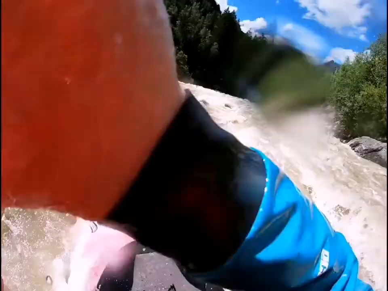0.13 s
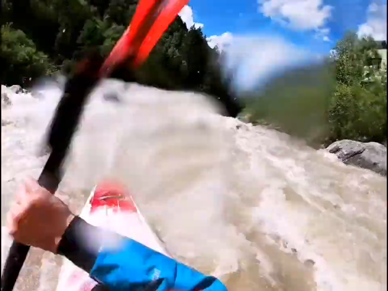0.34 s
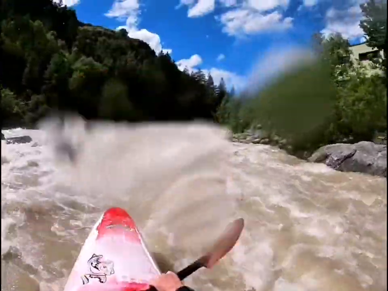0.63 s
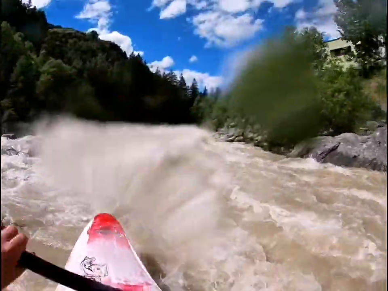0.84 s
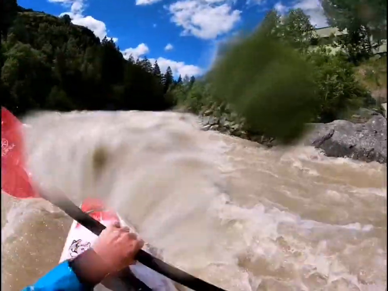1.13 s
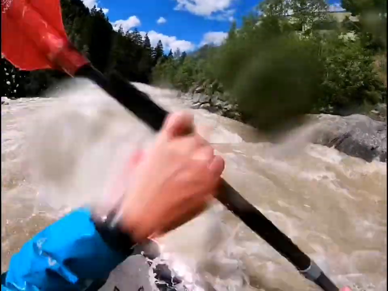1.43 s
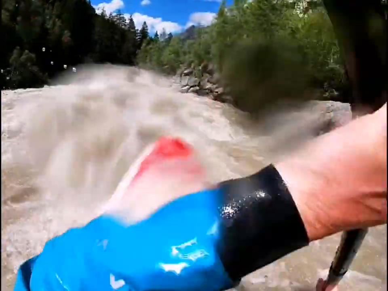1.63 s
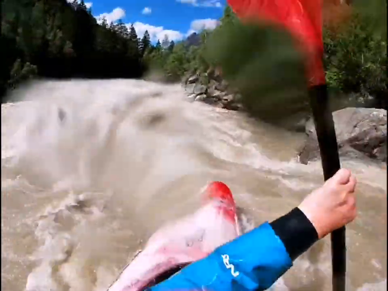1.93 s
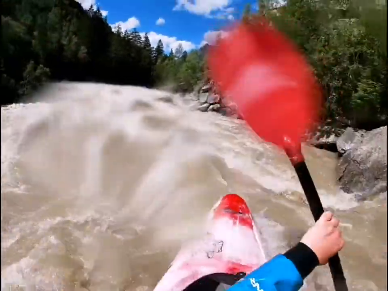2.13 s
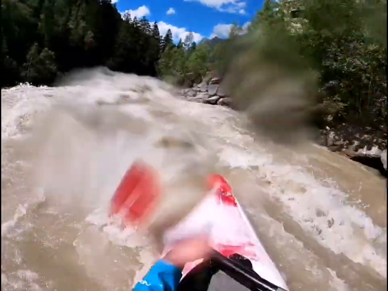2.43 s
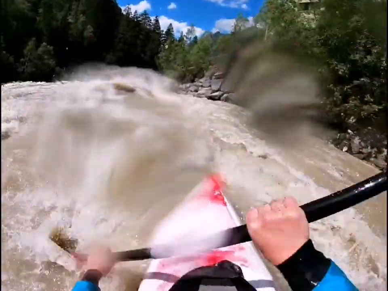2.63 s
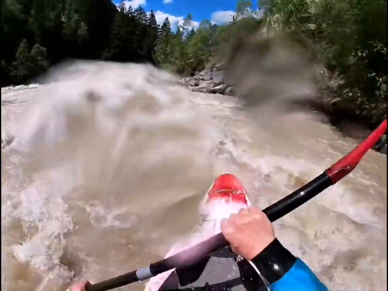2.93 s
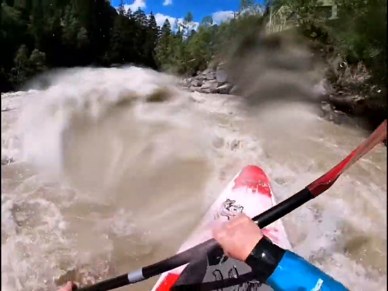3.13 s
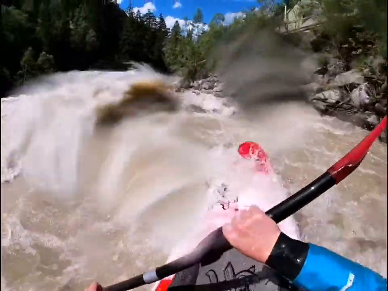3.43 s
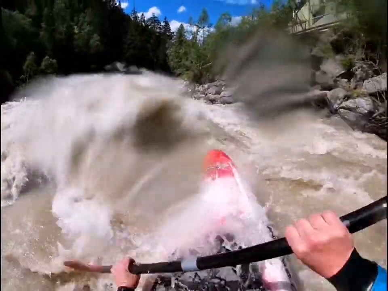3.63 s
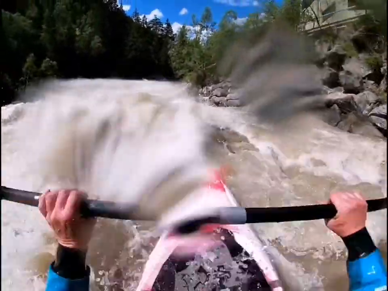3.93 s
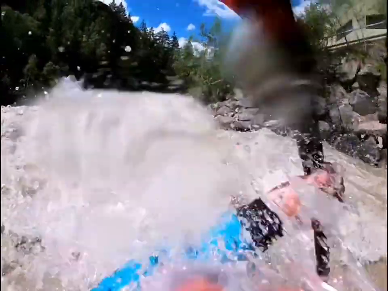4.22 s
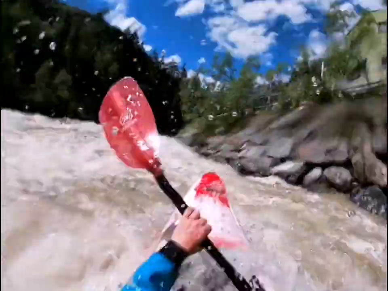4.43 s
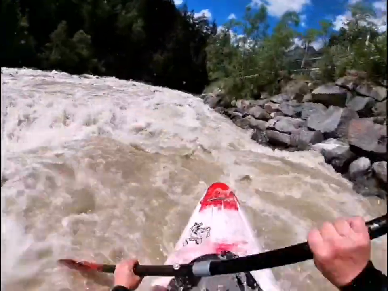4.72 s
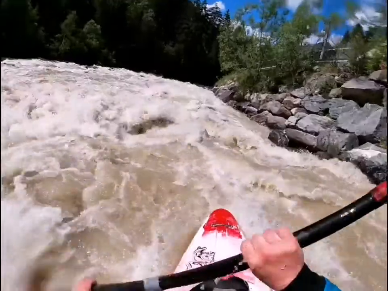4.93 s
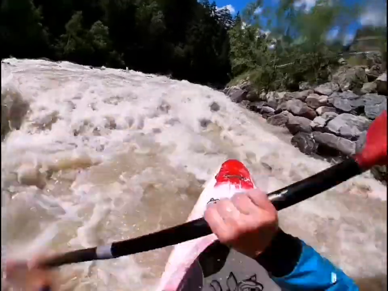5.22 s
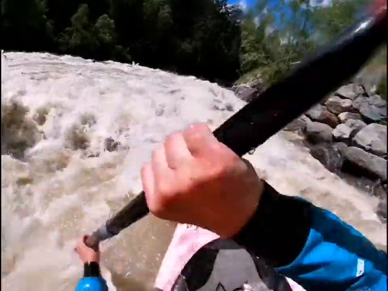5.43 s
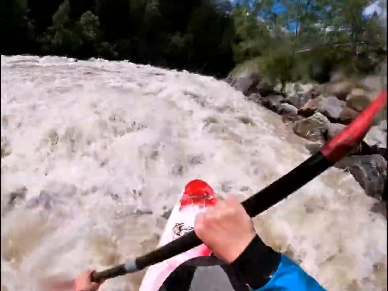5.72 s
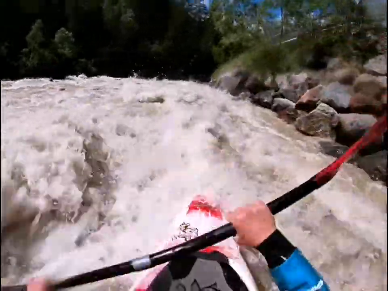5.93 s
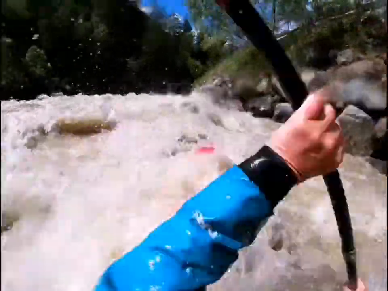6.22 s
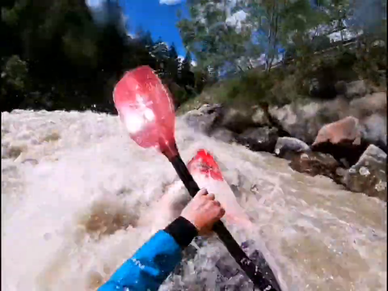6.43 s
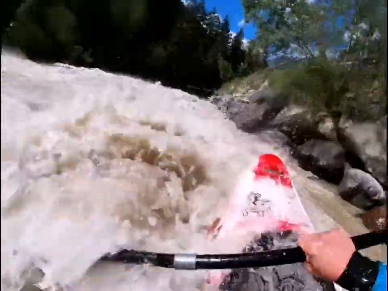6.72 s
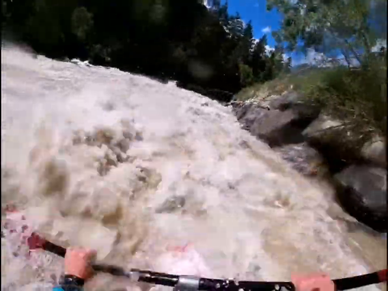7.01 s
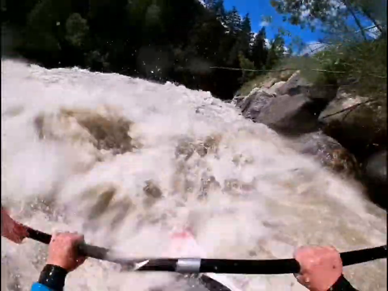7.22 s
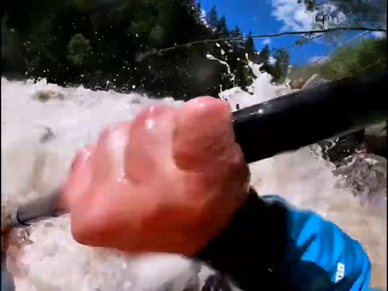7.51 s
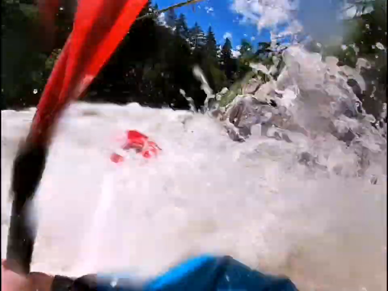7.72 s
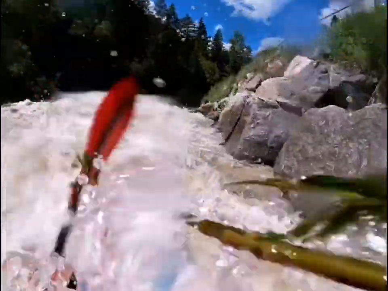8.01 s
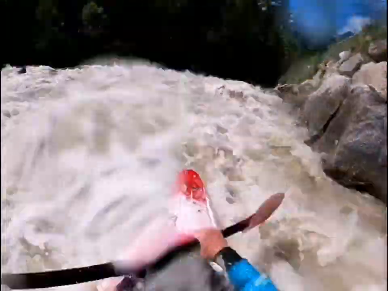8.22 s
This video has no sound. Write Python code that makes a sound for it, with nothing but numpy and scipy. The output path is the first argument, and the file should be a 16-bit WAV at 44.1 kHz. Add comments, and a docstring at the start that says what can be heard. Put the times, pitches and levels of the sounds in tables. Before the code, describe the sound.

Heavy low air rumble over a grainy rapids roar, water gurgling and tapping on the microphone, sharp spray bursting through twice, lastly with a hissing whistle.

```python
"""Loud rapids seen from a kayak: one helmet microphone, its port covered by a film of water.
Far off, the river's roar is flickering, grainy noise, muffled by the wet port's resonances.
Close in, air buffets the port as lumpy bass noise, water gulps round it, drops tick on its membrane.
Twice a wave breaks the film: bright noise of spray comes through, and air pockets ring at the port.
As the second wave strikes, a whistling band of noise wanders in pitch and width."""
import sys
import numpy as np
from scipy import signal
from scipy.fft import rfft, irfft, next_fast_len
from scipy.io import wavfile
from scipy.ndimage import map_coordinates

SR = 44100
rng = np.random.default_rng(int(sys.argv[2]) if len(sys.argv) > 2 else 0)


def gain_from_db(level_db):
    """Turn a decibel level (scalar or array-like) into a linear amplitude factor."""
    decades = np.asarray(level_db, float) / 20
    return 10 ** decades


def waveform_to_disk(signal):
    """Save audio, clipped to [-1, 1], as 16-bit WAV at the path in sys.argv[1]."""
    frames = np.transpose(np.atleast_2d(signal))
    scaled = np.clip(frames, -1, 1) * 32767
    samples = np.round(scaled).astype(np.int16)
    wavfile.write(sys.argv[1], SR, samples)


N = 369116  # samples

# Far river through the wet port:
# [t/s, level/dB, thinness of the film/dB, coarse foam/dB, fine foam/dB]
RIVER_COURSE = [(0, -38, 3.5, 0.5, -3.5), (.22, -45.5, 0.5, 1.5, -1), (.47, -45.5, 3.5, 1.5, -3.5),
                (.78, -44, 3, 0.5, -3.5), (1.05, -42, 5, 4.5, -3.5), (1.3, -42, 0.5, -2, -0.5),
                (1.45, -40.5, 6, 1, -4.5), (1.71, -46.5, 3.5, 3.5, 2), (1.93, -41.5, 3, -1, -4),
                (2.31, -41, 2.5, 2, -1), (2.65, -43.5, 4, 2, 0.5), (2.85, -40, 2.5, 2.5, 0),
                (3.1, -41.5, 1, 1.5, -4), (3.57, -42.5, 3, 2, -4), (4.02, -36.5, 1.5, 0.5, 0),
                (4.2, -36.5, 2, 3, 0), (4.33, -39, -3, 2, 1), (4.49, -35, -4, 5.5, -2.5),
                (4.7, -34.5, -6.5, -1, -5), (4.85, -41.5, -8, 1, -3), (5.05, -42.5, -2.5, 3, -2),
                (5.25, -41, -3, 1.5, 1), (5.5, -38.5, -3, -6.5, 2.5), (5.84, -33.5, -2.5, -4, 1),
                (6.0, -34, -2.5, -4, 3.5), (6.28, -35, -2.5, -3, 2.5), (6.53, -39.5, -2.5, -4, 0.5),
                (6.67, -43.5, -7.5, -5, 5), (6.87, -42, -6, -2, 6), (7.14, -42, -6, 3, 0),
                (7.27, -37.5, -2.5, 1, 1), (7.45, -33.5, -2, 2.5, 2), (7.63, -37, -3, 1, 5.5),
                (7.83, -35.5, -5, -4.5, 4.5), (8.06, -39, -2, 3, 1), (8.37, -44, 3, 0, 0)]
# What the film passes, by resonance:
# [offset/dB, share of the level's swing/1, share of the thinness/1]
FILM_PASSES = {"body": (0.74, 0.65, 0), "ring": (0, 0.86, 0), "film": (-16, 0.76, 0.79),
               "hiss": (-16, 0.51, 0.83), "top": (-28, 0.82, 0.96)}
# Water left by the first wave sharpens the two high resonances: [t/s, share/1]
WETNESS = [(4.5, 0), (5.4, .8), (6.3, 0.8), (6.8, 0.84), (7.4, 0.7), (8.37, 0.6)]
# Colours of the river's resonances, low to high: [f/Hz, relative density/dB]
BODY_COLOUR = [(700, -22), (840, 0), (1000, 3), (1250, -1.5), (1450, -11), (2000, -35)]
RING_COLOUR = [(1100, -29.5), (1350, -9), (1600, -2.5), (1820, -9), (1950, -21), (2200, -45.5)]
FILM_COLOUR = [(1700, -21.5), (1920, -4), (2100, -5.5), (2300, -12.5), (2600, -35.5)]
HISS_COLOUR = [(1800, -28), (2350, -7), (3300, -3.5), (3900, -10), (4400, -16.5), (5500, -44)]
SHARP_HISS_COLOUR = [(1900, -34), (2400, -11), (2900, -3.5), (3400, -4.5), (3800, -6.5), (4300, -16),
                     (5300, -43)]
TOP_COLOUR = [(3800, -31.5), (4400, -3.5), (5300, -4.5), (6200, -10), (7200, -17.5), (8500, -25.5),
              (10500, -34), (15000, -50.5)]
SHARP_TOP_COLOUR = [(4100, -42.5), (4700, -6.5), (5400, -4.5), (5900, -10), (6800, -16), (8500, -26),
                    (10500, -36.5), (15000, -55.5)]

# Air on the port: [t/s, strength/dB, big eddies over it/dB, small eddies' share of it/dB]
AIR_COURSE = [(0.0, -19.5, 0.5, -9.5), (0.075, -23, -8.5, -7.5), (0.11, -15, -8, -8), (0.17, -21, -4, -6.5),
              (0.21, -24, 4, -8), (0.32, -22.5, -1.5, -6.5), (0.51, -31.5, 1, -4.5), (0.65, -26, -8, -7),
              (1.12, -20, -10, -1.5), (1.19, -23, -6, -2), (1.26, -20, -8.5, -1), (1.51, -23.5, -3.5, -4),
              (1.72, -21.5, -3.5, -4), (1.81, -21.5, -4.5, -7.5), (1.84, -25, -8.5, -4.5),
              (2.12, -24.5, -8, -4), (2.14, -20.5, -23, -3.5), (2.21, -25, -7.5, -5.5),
              (2.28, -20.5, -19.5, -4), (2.31, -20, -10.5, -2), (2.56, -20, -11.5, -6.5),
              (2.63, -21, -1, -2.5), (2.75, -21.5, -6.5, -11), (2.91, -20, -5, -5.5), (3.22, -22, -2, -4),
              (3.28, -27.5, -4, -7.5), (3.36, -24.5, -1, -5.5), (3.59, -22.5, -2, -5),
              (3.8, -24.5, -5, -3.5), (3.98, -21.5, -10, -3), (4.07, -19.5, -11, -4.5),
              (4.15, -16.5, -13.5, -3.5), (4.31, -19.5, -4, -4.5), (4.61, -21, -7, -3.5),
              (4.94, -19.5, -5.5, -8.5), (4.99, -21, -12.5, -6), (5.06, -28, -2, -3), (5.08, -21, -9.5, -8),
              (5.38, -22.5, -16, -4.5), (5.48, -18, -14.5, -1), (5.59, -19, -12.5, -3.5),
              (6.18, -19, -8, -4), (6.41, -16.5, -3.5, -3.5), (6.55, -26.5, 3.5, -4.5),
              (6.85, -26, -7.5, -4), (6.99, -22, -6, -4.5), (7.02, -23.5, 3, -4.5),
              (7.18, -22, -16.5, -7.5), (7.26, -21, -13, -0.5), (7.3, -16, -10.5, -5), (7.41, -16, -7, -4),
              (7.53, -18, -4.5, -2.5), (7.95, -21.5, -0.5, -6.5), (8.07, -24, -10, -5),
              (8.14, -17, -9.5, -9.5), (8.37, -31.5, 1.5, -3)]
# Each size of eddy over its control: level/dB
EDDY_OFFSETS_DB = {"thump": 1.5, "rumble": -0.18, "roar": 0, "growl": -6.5}
# Buffeting reaches up into an otherwise hollow band: [t/s, length/s, level/dB]
REACHES = [(0, 0.18, -40), (1.546, 0.33, -39.5), (2.666, .03, -31.5), (2.736, 0.06, -37),
           (2.845, 0.072, -38.5), (2.963, 0.16, -37), (3.136, .06, -44), (3.24, 0.064, -41),
           (3.376, 0.072, -36.5), (3.52, 0.26, -40), (4.3, 0.29, -36), (4.63, 0.4, -38), (5.288, 0.25, -47),
           (5.551, 0.324, -35), (5.918, .5, -38), (6.452, 0.4, -41), (6.893, 0.39, -37.5),
           (7.607, 0.37, -40), (7.974, 0.57, -38.5)]
# Colours of the eddies, big to small, then of the hollow band: [f/Hz, relative density/dB]
THUMP_COLOUR = [(12, -28), (25, -3.5), (70, -5.5), (110, -8.5), (180, -39.5)]
RUMBLE_COLOUR = [(50, -35), (90, -5), (170, 1), (230, -3.5), (350, -41.5)]
ROAR_COLOUR = [(130, -51.5), (210, -6.5), (280, -2), (350, -6.5), (480, -31.5)]
GROWL_COLOUR = [(240, -50), (340, -2.5), (450, -1.5), (550, -8), (620, -21), (800, -59.5)]
EDGE_COLOUR = [(400, -40), (560, -5), (700, -9), (830, -12.5), (1100, -26.5)]
# Strongest lumps in the low buffeting noise: [t/s, peak/dB, f/Hz, half length/ms]
LUMP_EVENTS = [(.1, -10.5, 150, 11), (.145, -12.5, 200, 4.6), (.228, -18, 70.5, 7), (.3, -15.5, 100, 15),
               (1.745, -11, 138, 12), (1.812, -22.5, 199, 9.6), (2.28, -14, 198, 7.1), (2.45, -13, 185, 10),
               (2.475, -14.5, 314, 17), (2.515, -12, 220, 14), (2.556, -10, 220, 6.5), (2.58, -14, 200, 11),
               (2.597, -13.5, 110, 8.5), (4.068, -18, 266, 8), (4.115, -13, 242, 12), (4.15, -19, 150, 10),
               (4.202, -15.5, 287, 5.4), (4.272, -14, 90, 10), (4.37, -12, 110, 6.9),
               (4.627, -12, 150, 7.9), (5.565, -16, 225, 7.9), (6.385, -12.5, 227, 7.4),
               (6.985, -14, 130, 5.6), (7.015, -13.5, 70, 8), (7.3, -12, 198, 12), (7.362, -9.5, 278, 12),
               (7.404, -11, 250, 8.5), (7.426, -8, 240, 6), (7.49, -17, 199, 6.3), (7.5, -15.5, 260, 5.5),
               (7.645, -8.5, 129, 8.6), (7.858, -9.5, 275, 4.1)]

# Water gulping round the port, before the film: [t/s, level/dB, f/Hz]
GURGLE_EVENTS = [(0.1433, -20.5, 618), (0.19, -21, 1004), (1.6327, -18, 842), (1.753, -22, 617),
                 (1.8068, -20.5, 702), (1.834, -26, 620), (2.6821, -20.5, 682), (2.6952, -24, 717),
                 (2.7061, -25, 683), (2.7874, -22, 952), (2.989, -18.5, 840), (3.085, -23, 950),
                 (3.2585, -28, 634), (3.3787, -24.5, 870), (3.4, -25.5, 668), (3.435, -22.5, 697),
                 (4.473, -20, 624), (4.493, -21.5, 1220), (4.517, -23, 966), (4.54, -24.5, 1304),
                 (4.556, -22.5, 742), (4.62, -23, 1476), (4.655, -26.5, 896), (4.71, -25.5, 795),
                 (4.5998, -20, 824), (4.6118, -25.5, 815), (4.8177, -19, 842), (4.8923, -24.5, 660),
                 (5.6453, -24, 743), (5.6688, -19.5, 605), (5.701, -18.5, 658), (5.8272, -25.5, 708),
                 (6.0857, -24, 763), (6.9165, -17, 677), (6.9255, -19.5, 960), (6.942, -25.5, 728),
                 (6.9737, -23.5, 730), (7.068, -24.5, 927), (7.2626, -19, 642), (7.278, -20, 627),
                 (8.156, -19.5, 734), (8.188, -21.5, 824)]
# The film's muffling of those gulps: [f/Hz, relative gain/dB]
MUFFLE_COLOUR = [(200, -24), (450, 4), (1300, 2), (2000, -27), (3000, -66.5)]

# Short ticks and knocks, alone or within the drops: [t/s, peak/dB, f/Hz, half length/ms]
TICK_EVENTS = [(1.656, -24, 3520, .45), (1.6565, -12, 900, 1.4), (1.6565, -18, 1750, 1.1),
               (4.302, -35, 3100, 1.5), (4.3125, -29, 3200, 1.6), (4.316, -44, 6500, .5),
               (4.3375, -46, 6800, .4), (4.3235, -32, 5500, 1.5), (4.3645, -58, 7200, .4),
               (4.3702, -57, 10000, .1), (4.3755, -66, 10000, .15), (4.3912, -60, 10000, .1),
               (4.4075, -62, 11000, .2), (4.4665, -64, 8500, .2), (4.4685, -49, 5200, 2),
               (4.512, -62, 8000, .3), (4.621, -50, 4100, 3), (4.695, -47, 3000, 1),
               (6.3575, -51, 8500, .2), (6.381, -55, 10000, .2), (6.3915, -62, 9000, .15),
               (6.397, -61, 10000, .1), (6.4105, -42, 5800, 1.5), (6.411, -50, 11000, .1),
               (6.4135, -52, 10500, .1), (6.4185, -52, 10500, .1), (6.434, -45, 9000, .1),
               (6.4445, -65, 8500, .2), (6.598, -43.5, 3200, .5), (7.7545, -54, 8500, 0.22),
               (7.7545, -20, 1500, .9), (7.799, -12.5, 1410, 1.2), (7.876, -61, 8500, .2),
               (7.911, -60, 8500, .2), (7.939, -50, 4500, .25), (7.968, -60, 7200, .8),
               (8.0135, -60, 8000, .3), (8.035, -60, 9000, .3), (8.047, -52, 6500, .4),
               (8.058, -40, 2200, 1), (8.058, -54, 7000, .4), (8.09, -38, 3300, .6), (8.09, -48, 5500, .4),
               (8.095, -39, 4000, .8), (8.095, -52, 6300, .6), (8.1055, -22, 3700, 0.45),
               (8.1165, -15.5, 3750, 0.73), (8.1165, -31.5, 6000, .5), (8.1275, -14.5, 2120, .8),
               (8.106, -37, 6200, .5), (8.106, -50, 8700, .6), (8.1165, -48, 8800, .5),
               (8.1272, -22, 4800, .6), (8.128, -42, 7500, .5), (8.128, -56, 11500, .3),
               (8.138, -56, 11800, .5), (8.2045, -54, 8500, .3), (8.2215, -34, 5000, .4),
               (8.2325, -19, 5200, .5), (8.25, -16, 5000, .35), (8.25, -36, 6300, .4)]
# Drops on the port: [t/s, level/dB, then over it: thud/dB, knock/dB, sharpness/dB]
DROP_EVENTS = [(1.378, -44, -1, 4, 8), (1.389, -38.5, 3, 11.5, 6), (1.6565, -34, 7, 0, 4),
               (1.682, -55, -1, 0, 16), (1.691, -34, 9, 3, -5), (2.206, -27.5, -18, -18, -6),
               (4.3025, -37, 4, 7, -15), (4.3123, -36, 18, 21, 0), (4.323, -9, -7, -3, -16),
               (4.3435, -29, -11, 6, 19), (4.3644, -38, 7, 17, 9), (4.3699, -31, -9, 0, -4),
               (4.3909, -22.5, 0, -1, 17), (4.3927, -22.5, 6, -1, 0), (4.4, -22, 0, -9, 10),
               (4.409, -26, -4, -5, 0), (4.417, -18.5, 4, -9, 10), (4.4325, -39, 3, 1, 26),
               (4.4419, -13, -23, -18, -4), (4.4485, -21, -15, -19, 11), (4.467, -41, 9, 16, 16),
               (4.4826, -33, 10, -6, -3), (4.488, -32, 0, -2, -3), (4.459, -33, 0, 0, 8),
               (4.512, -46, 18, 6, 10), (4.5686, -21, -8, -23, 3), (4.6222, -48, 9, 14, 2),
               (4.6312, -42, 25, -3, 2), (4.7315, -27.5, -11, 2, 3), (5.442, -43, 17, -3, 0),
               (6.327, -41, -4, -8, 3.5), (6.357, -40, 21, 12, 13.5), (6.3805, -45, 14, 7, 20),
               (6.412, -11.5, -5.5, -4.5, -1), (6.4338, -52, 6, 6, 24), (6.488, -27, -4, 3, 0),
               (6.525, -34, 2, -13, 9), (6.603, -34.5, -14, -1, 8), (6.9046, -40, 9, 9, -1),
               (6.927, -23.5, 7, 6, 0), (7.076, -39, 7, -4, -11), (7.4617, -38.5, 1, -8, 3),
               (7.7352, -44, 2, -8, 8), (7.754, -36.5, 10, 17, 10), (7.789, -38, 0, 0, 0),
               (7.7981, -23.5, 0, 7.5, 9), (7.802, -39, -2, 5, 5), (7.811, -44, 0, -2, 0),
               (7.8777, -44, 22, 21, 16), (7.945, -31.5, 21, 5, 13), (7.966, -44, 21, 13, 8),
               (8.0133, -45, 8, -1, 21), (8.0354, -30, 12, 11.5, 13), (8.049, -34, -3, 13, 7),
               (8.0577, -44, 3, -1, 13), (8.0779, -38, 3, 3, -8), (8.1161, -20.5, 2, 1, 14),
               (8.1277, -17, -3, 5.5, 8.5), (8.1267, -23.5, 0, 4, 8), (8.2504, -31, 13, 6, 10)]
# Ragged parts of one drop: [level/dB, scatter in time/ms]
DROP_PARTS = [(0, .16), (-11, 1.4), (-15, 2.2)]
# Modes of the wet membrane: [f/Hz, half length/ms]
PORT_MODES = [(850, 0.87), (1650, 0.69), (2300, 0.39), (3100, 0.4), (5100, 0.24), (8000, 0.16)]

# Air pockets in the port: [t/s, f/Hz, width/Hz, level/dB, fade/(dB/s)]
POCKET_EVENTS = [(4.327, 3150, 652, -35, 1199), (4.457, 1850, 450, -39, 77), (8.105, 7450, 403, -62, 300),
                 (8.125, 7330, 500, -45, 1100), (8.135, 12000, 1800, -66, 700),
                 (8.185, 12000, 1600, -69, 50)]
# Whistling band as the second wave strikes: [t/s, f/Hz, width/Hz, level/dB]
WHISTLE_COURSE = [(8.09, 5000, 450, -90), (8.132, 4980, 450, -28), (8.17, 5000, 510, -35),
                  (8.195, 4880, 907, -41), (8.22, 4950, 1484, -34), (8.245, 4570, 893, -37),
                  (8.27, 4410, 894, -42), (8.29, 4540, 1093, -38), (8.32, 4820, 1100, -36),
                  (8.345, 5080, 805, -45), (8.37, 5280, 803, -39)]

# Slaps of a wave over the port: [t/s, hold/s, level/dB, brightness/1]
WAVE_SLAPS = [(4.315, 0.0089, -32, .3), (4.33, .008, -46, .8), (4.35, .02, -45, 0.1),
              (4.387, 0.0081, -30, 0), (4.414, 0.011, -31.5, 0.05), (4.439, 0.013, -32, 0),
              (8.116, 0.015, -27, 1.0), (8.161, 0.05, -30.5, 0.67), (8.224, .17, -31.5, 0.62)]
# Wash, fizz, sizzle and spray over a slap: [offset/dB, further gain at full brightness/dB]
SPRAY_OFFSETS_DB = [(1, -9), (-4.5, -4.5), (-23.5, 17), (-35, 8.5)]
# Colours of those four layers: [f/Hz, relative density/dB]
WASH_COLOUR = [(500, -34), (800, -1.5), (1500, 0.5), (2200, -0.5), (2700, -27)]
FIZZ_COLOUR = [(1900, -28.5), (2400, 2.5), (3300, 0), (4100, -1), (4800, -45)]
SIZZLE_COLOUR = [(3700, -29), (4300, -3), (5000, -11.5), (5800, -9), (6600, -24), (7400, -38)]
SPRAY_COLOUR = [(6000, -16), (6700, 0), (7600, -4.5), (8500, -7), (10000, -16.5), (11000, -18),
                (12300, -23), (13300, -38)]


def unit(x):
    """Scales x to rms 1."""
    return x / np.sqrt(np.mean(x ** 2) + 1e-20)


def curves(rows):
    """Draws one value per sample for each column after the time."""
    s, *columns = np.transpose(rows)
    return [np.interp(np.arange(N) / SR, s, column) for column in columns]


def wobble(rate):
    """A smooth random curve, rate knots a second."""
    knots = rng.standard_normal(int(N * rate / SR) + 4)
    return map_coordinates(knots, [np.arange(N) * rate / SR])


def plateau(s, hold_s, rise_s, fall_db_per_s):
    """Gain that rises to 1 at s, holds, then fades."""
    t = np.arange(N) / SR - s
    rise = np.clip(1 + t / rise_s, 0, 1) ** 2
    return rise * gain_from_db(-fall_db_per_s * np.clip(t - hold_s, 0, 9))


def coloured(x, spectrum):
    """Filters x through (f/Hz, level/dB) points on a log axis, to rms 1."""
    size = next_fast_len(N + 8192)  # room for the filter's tail
    hz, db = np.transpose(spectrum)
    log_hz = np.log(np.fft.rfftfreq(size, 1 / SR) + 1)
    gain = gain_from_db(np.interp(log_hz, np.log(hz), db, left=-120, right=-120))
    return unit(irfft(rfft(x, size) * gain, size)[:N])


def rush(spectrum, flutter_db, rate, grain_db):
    """Noise that flutters in level, with sparse bursting bubbles of unequal size on it."""
    struck = rng.random(N) < .008
    bursts = struck * rng.standard_normal(N) * np.sqrt(rng.exponential(size=N))
    noise = rng.standard_normal(N) * gain_from_db(flutter_db * wobble(rate))
    return coloured(noise + gain_from_db(grain_db) * unit(bursts), spectrum)


def blips(rows):
    """Each event is one short bell-shaped blip at its own pitch and random phase."""
    half = SR // 25
    out, t = np.zeros(N), np.arange(-half, half) / SR
    for (s, db, hz, ms), turn in zip(rows, rng.random(len(rows))):
        tone = np.cos(2 * np.pi * (hz * t + turn))
        out[round(s * SR) - half:][:len(t)] += gain_from_db(db) * tone * np.exp(-(t * 1e3 / ms) ** 2)
    return out


def river():
    """The far roar, passed by the water film in broad resonances, the high ones more when it is thin."""
    level_db, thin_db, coarse_db, fine_db = curves(RIVER_COURSE)
    mean_db = -41.5
    gain = {name: gain_from_db(mean_db + db + swing * (level_db - mean_db) + share * thin_db)
            for name, (db, swing, share) in FILM_PASSES.items()}
    sharp = np.clip(curves(WETNESS)[0], 0, 1)
    top = (np.sqrt(1 - sharp) * rush(TOP_COLOUR, 0.98, rate=33, grain_db=-11.0)
           + np.sqrt(sharp) * rush(SHARP_TOP_COLOUR, 1.2, rate=30, grain_db=-12.5))
    hiss = (np.sqrt(1 - sharp) * rush(HISS_COLOUR, 0.92, rate=42, grain_db=-10.5)
            + np.sqrt(sharp) * rush(SHARP_HISS_COLOUR, 1.1, rate=54, grain_db=-11))
    surge = gain_from_db(.6 * wobble(9))  # shared by all resonances
    return surge * (gain["body"] * gain_from_db(coarse_db) * rush(BODY_COLOUR, 0.99, rate=20, grain_db=-7.0)
                    + gain["ring"] * rush(RING_COLOUR, 0.75, rate=15, grain_db=-6.5)
                    + gain["film"] * rush(FILM_COLOUR, 1.3, rate=7.6, grain_db=-12.5)
                    + gain["hiss"] * hiss
                    + gain["top"] * gain_from_db(fine_db) * top)


def air():
    """Eddies press on the port: the bigger, the lower; pushes are sharper than pulls."""
    strength_db, big_db, small_db = curves(AIR_COURSE)
    middle = np.sqrt(np.clip(1 - gain_from_db(small_db) ** 2, .05, 1))  # what the small eddies leave
    mean_db = -22.5
    swing_db = 0.81 * (strength_db - mean_db) + 0.44 * small_db  # of the smallest eddies
    offset = EDDY_OFFSETS_DB
    thump = gain_from_db(strength_db + big_db + offset["thump"]) * rush(THUMP_COLOUR, 1.3, rate=10.0, grain_db=-23.5)
    rumble = gain_from_db(strength_db + offset["rumble"]) * rush(RUMBLE_COLOUR, 1.7, rate=12, grain_db=-27.0)
    roar = gain_from_db(strength_db + small_db + offset["roar"]) * rush(ROAR_COLOUR, 1.0, rate=12, grain_db=-18.5)
    growl = gain_from_db(mean_db + swing_db + offset["growl"]) * rush(GROWL_COLOUR, 1.1, rate=20, grain_db=-21.0)
    shared = gain_from_db(0.075 * wobble(11.0))  # by all sizes
    push = shared * (thump + middle * rumble + roar + growl)
    push = push + 0.35 * (push ** 2 - np.mean(push ** 2))
    reach = gain_from_db(-48.5 + 0.37 * swing_db)
    for s, length_s, db in REACHES:
        reach = reach + gain_from_db(db) * plateau(s, length_s, rise_s=0.028, fall_db_per_s=210)
    return push + reach * rush(EDGE_COLOUR, 2.8, rate=31, grain_db=-9.0)


def lumps():
    """Loud lumps of the bass noise, each a short low blip."""
    return blips(LUMP_EVENTS)


def gurgles():
    """A gulp is a big bubble: a quick swell and a few dying cycles, muffled by the film."""
    out, t = np.zeros(N), np.arange(SR // 40) / SR
    for (s, db, hz), turn in zip(GURGLE_EVENTS, rng.random(len(GURGLE_EVENTS))):
        age = t * hz / 0.92  # in units of the swell time
        swell = age * np.exp(1 - age)
        out[round((s - .85 / hz) * SR):][:len(t)] += gain_from_db(db) * swell * np.sin(2 * np.pi * (hz * t + turn))
    return coloured(out, MUFFLE_COLOUR) * np.sqrt(np.mean(out ** 2))  # overall level kept


def ticks():
    """Short ticks and knocks, alone or within the drops, each at its own pitch."""
    return blips(TICK_EVENTS)


def drops():
    """Each drop lands in ragged parts that shake the membrane's modes, a little off pitch and time."""
    out, half = np.zeros(N), SR // 100
    hz, ms = np.transpose(PORT_MODES)[:, :, None]
    chance = rng.standard_normal((len(DROP_EVENTS), len(DROP_PARTS), 3, len(PORT_MODES), 1))
    for (s, db, thud, knock, sharp), parts in zip(DROP_EVENTS, chance):
        between = knock / 2 - 10.5  # third mode, under the mean of its neighbours
        # the topmost mode gains less from sharpness
        gains = gain_from_db(db + np.array([thud, knock, between, 0, -17.5 + sharp, -41 + .55 * sharp]))
        for (part_db, scatter_ms), (detune, turn, late) in zip(DROP_PARTS, parts):
            t = np.arange(-half, half) / SR - scatter_ms / 1e3 * late[0]  # one delay for all modes
            tones = np.cos(2 * np.pi * (hz * (1 + .04 * detune) * t + .12 * turn))
            modes = tones * np.exp(-(t * 1e3 / ms) ** 2)
            out[round(s * SR) - half:][:2 * half] += gain_from_db(part_db) * gains @ modes
    return out


def pockets():
    """Trapped air rings, wandering as fast as its band is wide, then sags in pitch as the water shifts."""
    out, t = np.zeros(N), np.arange(N) / SR
    for s, hz, width_hz, db, fade_db_per_s in POCKET_EVENTS:
        a, b = wobble(width_hz), wobble(width_hz)
        hold_s = 180 / hz  # 180 cycles: small pockets give way sooner
        sag_hz, sag_s = min(0.076 * hz, 450), 0.16
        pitch_hz = hz - sag_hz * (1 - np.exp(-np.clip(t - s - hold_s, 0, 9) / sag_s))
        phase = 2 * np.pi * np.cumsum(pitch_hz) / SR
        tone = unit(a * np.cos(phase) + b * np.sin(phase))
        out += gain_from_db(db) * plateau(s, hold_s, 0.025, fade_db_per_s) * tone
    return out


def whistle():
    """As the second wave strikes, a whistling band of noise wanders in pitch and width."""
    hz, width_hz, db = curves(WHISTLE_COURSE)
    knots = np.cumsum(width_hz) / SR  # a wider band wanders faster
    a, b = (map_coordinates(rng.standard_normal(int(knots[-1]) + 4), [knots]) for _ in range(2))
    phase = 2 * np.pi * np.cumsum(hz) / SR
    return gain_from_db(db) * unit(a * np.cos(phase) + b * np.sin(phase))


def waves():
    """Spray right at the opened port: grainy noise, its upper layers stronger in bright slaps."""
    colours = (WASH_COLOUR, FIZZ_COLOUR, SIZZLE_COLOUR, SPRAY_COLOUR)
    layers = [rush(colour, 1.9, rate=120, grain_db=-9.5) for colour in colours]
    out = np.zeros(N)
    for s, hold_s, db, bright in WAVE_SLAPS:
        slap = plateau(s, hold_s, rise_s=0.023, fall_db_per_s=601)
        for (offset_db, bright_db), layer in zip(SPRAY_OFFSETS_DB, layers):
            out += slap * gain_from_db(db + offset_db + bright * bright_db) * layer
    return out


def scene():
    """Everything, far and near, meets at one port."""
    far = river()
    near = air() + lumps() + gurgles()
    at_port = ticks() + drops() + pockets() + whistle() + waves()
    return (far + near + at_port)[None]


def band_limit(x):
    """A steep low-pass at the top of the band."""
    return signal.sosfilt(signal.butter(12, 15500, fs=SR, output="sos"), x)


def record(dry):
    """The microphone's preamplifier rounds off the tallest peaks."""
    rounded = dry / (1 + np.abs(dry / .85) ** 4) ** (1 / 4)
    return band_limit(rounded)


dry = scene()
out = record(dry)
waveform_to_disk(out)
```